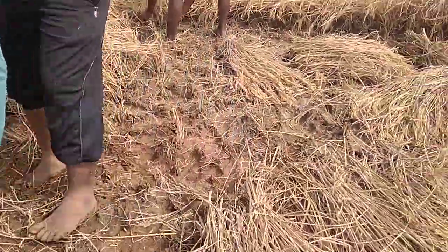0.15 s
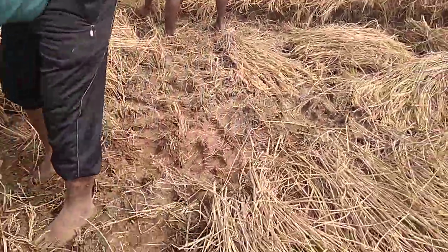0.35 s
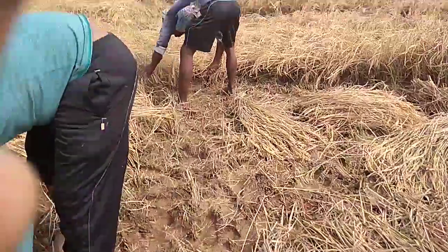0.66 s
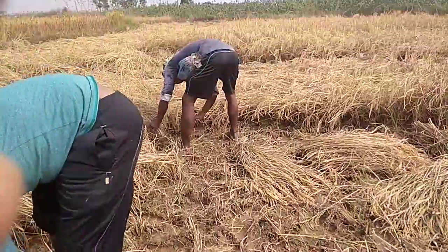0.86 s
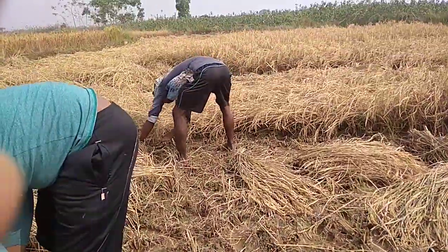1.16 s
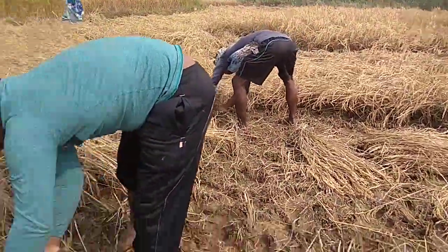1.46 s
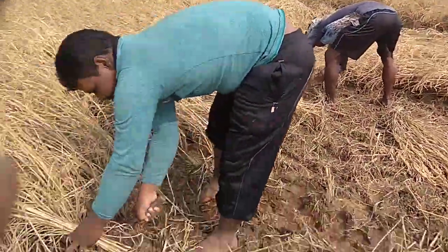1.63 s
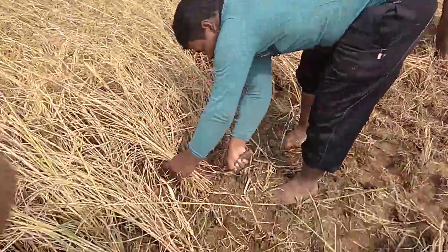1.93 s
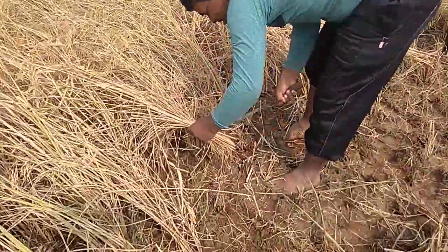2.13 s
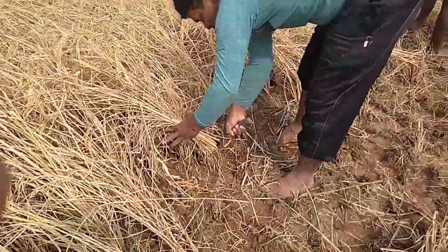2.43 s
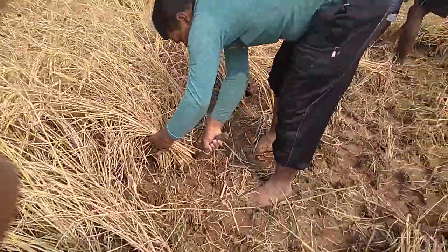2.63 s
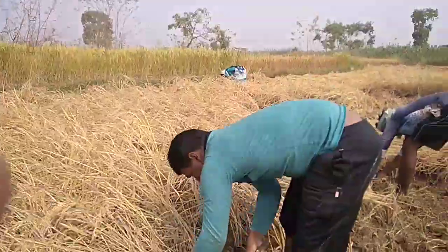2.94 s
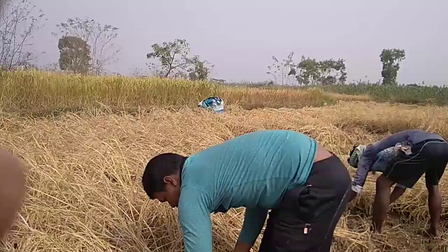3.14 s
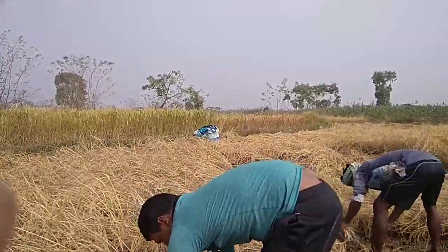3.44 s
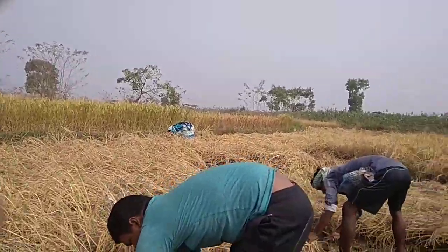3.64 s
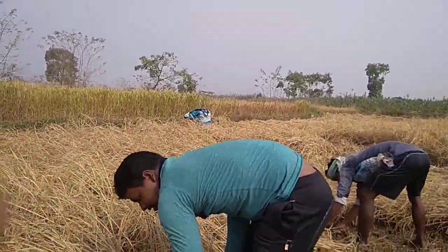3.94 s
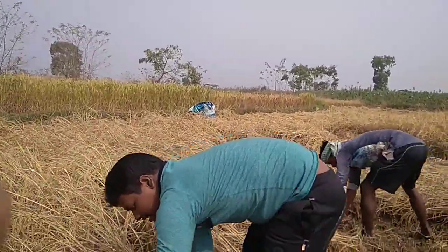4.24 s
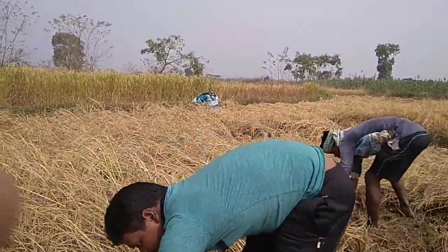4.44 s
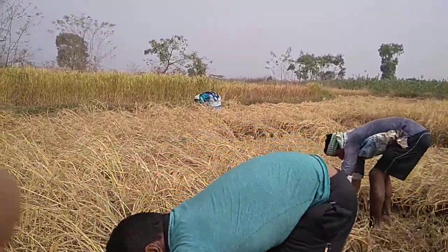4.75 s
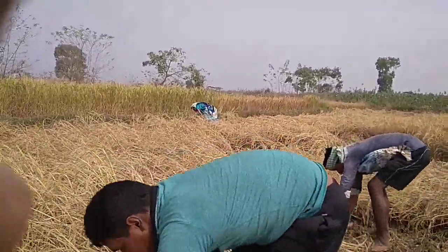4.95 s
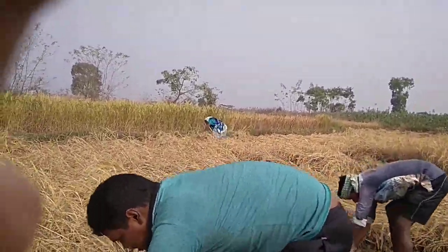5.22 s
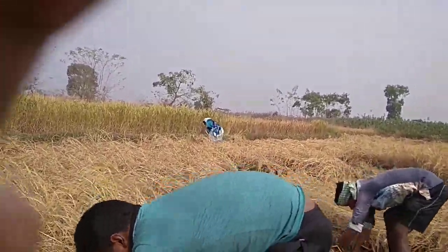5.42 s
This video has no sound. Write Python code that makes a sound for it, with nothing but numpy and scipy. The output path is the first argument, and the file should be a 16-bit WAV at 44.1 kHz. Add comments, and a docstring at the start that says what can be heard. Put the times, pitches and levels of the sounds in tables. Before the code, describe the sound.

In an open field, dry rice straw is handled close to a hand-held stereo camera, mainly on the left, with a faint steady noise beneath. At first there is only thin rustling and a few small cracks; a light sickle cut comes at 0.6 s with a tiny creak. A stronger, crisp cut at 1.1 s brings a burst of sharp snaps, and a faint distant whistle glides upward around 0.8-1.3 s. Husky swishes swell at 1.5 and 1.8 s, then another tearing cut at 2.1 s. Cuts follow near 3.0, 3.9, 4.9 and 5.6 s, each a quick double rasp with dull rubbing and hollow stem cracks; the one at 4.9 s is crisp, the 3.9 s one duller. Light knocks and bumps hit at 3.0 and 3.35 s. Low, fluttering wind buffets thump from 3.7 to 4.1 s and again near 4.6 s, while the bright straw hiss grows denser towards the end.

```python
"""Dry straw rustles close by on the left, and about once a second a sickle tears through a bunch.
Workers reap rice by hand in an open field: straw is made of tiny random fractures, the blade of noise
that swells with each bite, and snapping stems of short cracks with a hollow knock.
Wind at the two microphone ports of a hand-held camera is slow noise; buffets and handling bumps are brief
pressure swings. Dull rubs, light knocks, a faint steady noise and a far whistle of gliding tones join in."""
import sys
import numpy as np
from scipy import signal
from scipy.fft import rfft, irfft, next_fast_len
from scipy.io import wavfile
from scipy.ndimage import map_coordinates

SR = 44100
rng = np.random.default_rng(int(sys.argv[2]) if len(sys.argv) > 2 else 0)


def put_to_file(sound):
    """Save the sound as 16-bit audio at rate SR, in the file named by the first command-line argument."""
    columns = np.atleast_2d(sound).T  # one column per channel
    safe = np.clip(columns, -1, 1)
    whole_steps = np.round(safe * 32767)
    wavfile.write(sys.argv[1], SR, whole_steps.astype(np.int16))


N = 246078
TIME = np.arange(N) / SR

# sickle strokes, two bites each: (first bite [s], wait for the second [s], bite level before lifts [dB],
# second bite over first [dB], pull hiss before lifts [dB], pull rise and fall [s], left over right [dB])
STROKES = [(0.558, 0.025, -42.5, 2.5, -32.5, 0.067, 8.5), (1.092, 0.03, -36, 3, -30.5, 0.071, 7),
           (2.062, 0.026, -35.5, 0.5, -34.5, 0.04, 7.5), (2.967, 0.03, -38, 4, -33.5, 0.026, 13),
           (3.872, .024, -41, -8, -55, .02, 5), (4.943, 0.017, -33.5, -5, -31, 0.16, 7),
           (5.575, 0.022, -43, 6, -31.5, .02, 8)]
# colour of husks and thin cracks: (frequency [Hz], relative level [dB])
HUSK_COLOUR = [(300, -69), (1000, -29), (3200, -12), (5000, -11.5), (6400, -16), (7400, -2), (8700, 2),
               (11500, 2.5), (13500, 0), (16000, -9)]
# dull colour of the blade's drag and the rubs: (frequency [Hz], relative level [dB])
SCRAPE_COLOUR = [(80, -11), (200, -2), (320, 4), (520, -2), (700, -9), (1100, -19), (3000, -19)]
SNAP_SIDE_DB = 10.5  # snaps and creaks lie to the left


def amp(db):
    """Turn decibels into a gain."""
    return 10 ** (np.asarray(db) / 20)


def unit(x):
    """Scale a signal to an rms (average strength) of 1."""
    return x / np.sqrt(np.mean(x ** 2) + 1e-20)


def along(points, hz):
    """Read (frequency, value) points at any frequency, on a log axis."""
    f, value = np.transpose(points)
    return np.interp(np.log(hz + 1), np.log(f + 1), value)


def curves(rows):
    """Draw straight lines between the rows: one value per sample for each column after the time."""
    s, *columns = np.transpose(rows)
    return [np.interp(TIME, s, column) for column in columns]


def wobble(rate):
    """Make a smooth random curve with `rate` random points a second."""
    points = rng.standard_normal(int(N * rate / SR) + 4)
    return map_coordinates(points, [TIME * rate])


def swell(s, rise, fall):
    """A rounded peak of height 1 at time s with exponential flanks."""
    return np.exp(1 - np.hypot(1, (TIME - s) / np.where(TIME < s, rise, fall)))


def filtered(x, response):
    """Multiply the spectrum of x by a response that depends on frequency."""
    m = next_fast_len(N + 8192)
    spectrum = rfft(x, m) * response(np.fft.rfftfreq(m, 1 / SR))
    return irfft(spectrum, m)[..., :N]


def coloured(x, spectrum):
    """Shape x by a table of relative levels, then scale it to rms 1."""
    return unit(filtered(x, lambda hz: amp(along(spectrum, hz))))


def panned(side_db):
    """Left and right gains of constant total power."""
    left = amp(np.atleast_1d(side_db))
    return np.array([left, np.ones_like(left)]) / np.sqrt(1 + left ** 2)


def crackle(spectrum, rate, spread_db, smooth):
    """Stereo stream of tiny fractures, `rate` a second, on a bed of countless finer ones."""
    # likeness of left and right: (frequency [Hz], likeness [0 to 1])
    likeness = [(200, 0.99), (1000, 0.84), (2500, 0.24), (5000, 0.17), (10000, 0.02)]
    count = int(rate * N / SR)
    size = amp(spread_db * np.minimum(rng.exponential(size=count), 2))
    energy = np.bincount(rng.integers(0, N, count), size ** 2, N)
    # each fracture scatters among the neighbouring stalks for a few milliseconds
    energy = signal.fftconvolve(energy, amp(-60 * TIME[:1024] / .006))[:N]
    strength = np.sqrt(np.abs(energy / energy.mean()) + smooth)
    grains = strength * rng.standard_normal((2, N))

    def mid_and_side(hz):
        turn = np.arccos(np.clip(along(likeness, hz), -1, 1)) / 2
        return np.array([np.cos(turn), np.sin(turn)])

    mid, side = filtered(grains, mid_and_side)
    return coloured(np.array([mid + side, mid - side]), spectrum)


def clumped(x):
    """Stems of different width take turns to sound, so the colour shifts from moment to moment."""
    clump_db, clumps_per_s = 1.7, 45
    z = signal.stft(x, nperseg=512)[2]
    bins, frames = np.indices(z.shape[1:])
    points = rng.standard_normal(z.shape[1:])
    # one frame is 256 samples
    patches = map_coordinates(points, [bins / 2, frames * clumps_per_s * 256 / SR])
    shifted = z * amp(clump_db * unit(patches))
    return unit(signal.istft(shifted, nperseg=512)[1][:, :N])


def background():
    """A faint, steady background noise, almost all on the left."""
    # (frequency [Hz], relative level [dB])
    background_colour = [(60, 13.5), (250, 3.5), (500, -3), (1000, -13), (2000, -6.5), (3200, 7),
                         (5000, -19), (9000, -33), (16000, -12.5)]
    return amp(-54.0) * panned(21) * coloured(rng.standard_normal((2, N)), background_colour)


def whistle():
    """Thin, airy tones glide upwards and level off, scattered and broken up by the distance."""
    # far notes: (middle [s], length [s], start pitch [Hz], end pitch [Hz], peak level before wobble [dB])
    notes = [(.905, .3, 2130, 3060, -54.5), (1.22, .11, 1470, 1670, -57.5)]
    glide_share, glide_early = .16, .09  # as shares of the note's length
    far_t60_s, far_wet = .12, .55  # time to fade by 60 dB, amount of scattered sound
    out = np.zeros(N)
    for s, length, start_hz, end_hz, db in notes:
        u = np.clip((TIME - s) / length, -.5, .5)
        glide = (1 + np.tanh((u + glide_early) / glide_share)) / 2
        hz = start_hz + (end_hz - start_hz) * glide
        waver = 1 + .032 * wobble(900)  # fast pitch jitter makes the tone airy
        tone = np.sin(2 * np.pi * np.cumsum(hz * waver) / SR)
        out += amp(db + 3 * wobble(120)) * np.cos(np.pi * u) * tone
    tail = rng.standard_normal(8192) * amp(-60 * TIME[:8192] / far_t60_s)
    scattered = signal.fftconvolve(out, tail / np.linalg.norm(tail))[:N]
    return np.sqrt(1 - far_wet ** 2) * out + far_wet * scattered


def wind():
    """Eddies pass each port on their own; a strong gust breaks up into smaller, faster ones."""
    # steady breeze at the ports: (time [s], level before lifts [dB])
    breeze = [(0, -57), (.8, -60.5), (1.9, -61.5), (2.6, -48.5), (3.5, -70), (4.3, -42), (4.8, -45),
              (5.58, -47)]
    # gusts on top of it: (time [s], level before lifts [dB], rise and fall [s])
    gust_rows = [(2.985, -41.5, 0.021), (3.284, -43, 0.12), (3.666, -49, .03), (3.784, -33.5, 0.056),
                 (4.002, -28.5, 0.11), (4.586, -32, 0.067), (5.01, -36, 0.068), (5.57, -41, 0.025)]
    # colour of the deep rumble: (frequency [Hz], relative level [dB])
    rumble_colour = [(20, -1), (45, 2.5), (75, 6), (120, 4.5), (170, -8), (260, -23), (400, -59),
                     (700, -48), (1500, -34.5), (4000, -100)]
    # colour of the smaller eddies: (frequency [Hz], relative level [dB])
    flutter_colour = [(40, -23), (120, 4.5), (230, 2), (330, -9), (450, -22), (700, -66), (1500, -65),
                      (4000, -100)]
    breeze_db, = curves(breeze)
    gusts = sum(amp(db) * swell(s, half, half) for s, db, half in gust_rows)
    wind_db = 20 * np.log10(np.hypot(amp(breeze_db), gusts))
    lumps = amp(2.8 * np.array([wobble(35), wobble(35)]))
    rumble = unit(lumps * coloured(rng.standard_normal((2, N)), rumble_colour))
    rumble = amp(wind_db + 1.5) * rumble
    flutter = unit(lumps * coloured(rng.standard_normal((2, N)), flutter_colour))
    # flutter grows 2.48 dB for each dB of wind
    flutter = amp(2.48 * (wind_db - wind_db.max()) - 28) * flutter
    return rumble * amp([[-.5], [.5]]) + flutter * panned(13.0)


def bumps():
    """Wind buffets and handling bumps: each is a brief pressure swing at the ports with a short scuff."""
    # (time [s], size [dB], pitch [Hz], left over right [dB])
    swings = [(0.042, -34, 73, -14), (0.138, -30.5, 310, 31), (1.489, -33, 121, -23), (1.641, -28, 306, 24),
              (1.648, -37, 1300, 23), (2.087, -24.5, 440, 10), (2.988, -19, 570, 26), (3.205, -30, 151, 29),
              (3.3, -22, 116, 14), (3.3456, -14.5, 613, 38), (3.349, -20.5, 118, 26), (3.364, -31, 560, 26),
              (3.368, -29.5, 130, 22), (3.734, -13.5, 143, 20), (3.823, -11.5, 127, -22),
              (3.858, -18, 120, -20), (3.872, -27, 328, 22), (3.927, -17, 141, 15), (3.938, -21.5, 338, 22),
              (3.952, -10.5, 246, 27), (3.986, -17, 130, -18), (4.019, -13.5, 171, 24),
              (4.031, -20, 230, 18), (4.05, -17, 218, 23), (4.551, -17, 132, 27), (4.613, -19, 167, -23),
              (4.635, -12.5, 260, -33), (4.666, -13.5, 165, -31), (5.555, -22, 165, 45)]
    out = np.zeros((2, N))
    for s, db, hz, side_db in swings:
        near = np.abs(TIME - s) < .06
        t = TIME[near] - s
        swing = np.sin(2 * np.pi * hz * t + rng.uniform(0, 2 * np.pi)) / np.cosh(3.17 * hz * t)
        low_pass = signal.butter(4, 2 * hz, fs=SR)
        scuff = unit(signal.lfilter(*low_pass, rng.standard_normal(len(t))))
        trail = np.clip(t * hz, 0, 1) * amp(-26 - 60 * np.abs(t) / 0.15)
        out[:, near] += panned(side_db) * amp(db) * (swing + trail * scuff)
    return out


def knocks():
    """A light knock, perhaps a finger on the camera: a damped tone, a tick and a short case rattle."""
    # (time [s], strength [dB], pitch [Hz])
    taps = [(2.9944, -17, 1300), (3.3529, -14, 840), (3.3722, -28, 1100)]
    # colour of the case: (frequency [Hz], relative level [dB])
    case_colour = [(200, -18), (800, -7), (1700, 1), (3200, -15), (5000, -10), (9000, -15), (16000, -33)]
    knock_t60_s, rattle_t60_s = 0.0053, 0.077  # times to fade by 60 dB
    rattle_db, side_db = -25, 32  # rattle against the strength of the knock, left over right
    out, t = np.zeros(N), TIME[:4096]
    for s, db, hz in taps:
        case = coloured(rng.standard_normal(N), case_colour)[:len(t)]
        blow = (np.sin(2 * np.pi * hz * t) + .35 * case) * amp(-60 * t / knock_t60_s)
        chatter = amp(5 * wobble(400)[:len(t)])
        rattle = case * chatter * amp(rattle_db - 60 * t / rattle_t60_s)
        out[round(s * SR):][:len(t)] += amp(db) * (blow + rattle)
    return panned(side_db) * out


def rubs():
    """Dull, low rubs on the left, several just before a sickle stroke: swells of low crackle."""
    # (time [s], level [dB], rise and fall [s])
    rub_rows = [(0.165, -49, 0.017), (0.395, -50, 0.014), (0.538, -49, 0.02), (1.061, -42.5, 0.015),
                (1.908, -50.5, .02), (2.014, -47, 0.02), (2.504, -55, 0.065), (2.777, -53.5, 0.033),
                (2.962, -40, 0.012), (3.842, -39, 0.0068), (3.95, -46, .025), (5.221, -45, 0.016)]
    level = sum(amp(db) * swell(s, half, half) for s, db, half in rub_rows)
    return panned(11) * level * crackle(SCRAPE_COLOUR, rate=260, spread_db=2.5, smooth=0.3)


def creaks():
    """The blade squeaks briefly in a narrow band of noise as it cuts through the bunch."""
    # (time [s], level [dB], rise and fall [s])
    squeaks = [(.604, -43, .009)]
    # (frequency [Hz], relative level [dB])
    squeak_colour = [(2400, -50), (3050, -2), (3350, 0), (3650, -7), (4100, -50)]
    level = sum(amp(db) * swell(s, half, half) for s, db, half in squeaks)
    return panned(SNAP_SIDE_DB) * level * coloured(rng.standard_normal(N), squeak_colour)


def snaps():
    """A breaking stem gives a thin crack with a short scatter; its hollow tube knocks at its own pitch."""
    # runs under the blade or single snaps in the hand: (time [s], crack peak [dB], hollow knock peak [dB])
    breaks = [(.279, -31, -45), (.319, -29, -44), (.463, -21, -43), (.5335, -16, -33), (.618, -20, -37),
              (.648, -21, -40), (.757, -13, -37), (.5545, -19, -30), (.5755, -18, -22), (.5812, -15, -16),
              (.587, -19, -24), (.5955, -18, -28), (.601, -20, -32), (1.0455, -13, -33), (1.0475, -10, -30),
              (1.071, -15, -29), (1.0858, -7, -18), (1.0905, -10, -21), (1.0922, -11, -16),
              (1.1115, -14, -27), (1.1145, -11, -17.5), (1.1188, -6.5, -20), (1.123, -6.5, -20),
              (1.129, -14, -30), (1.918, -17, -32), (2.0105, -17, -27), (2.0602, -13, -18.5),
              (2.0655, -17, -23), (2.0715, -14, -17.5), (2.0785, -16, -21.5), (2.0935, -11, -19.5),
              (2.0975, -11, -19.5), (2.106, -18, -29), (2.294, -13, -33), (2.946, -23, -24),
              (2.962, -21, -26), (2.969, -23, -26), (2.99, -19, -25), (2.998, -13, -29), (3.3523, -18, -23),
              (3.757, -13, -33), (3.8435, -27, -23), (3.8538, -24, -19), (3.857, -26, -28),
              (3.870, -25, -27), (3.8783, -23, -19.5), (4.595, -11, -29), (4.711, -20, -33),
              (4.93, -10, -20), (4.9345, -12, -14), (4.9435, -18, -21), (4.953, -16, -22),
              (4.9585, -7, -15), (4.962, -9, -17), (4.972, -17, -25)]
    # colour of a stem splitting along its length: (frequency [Hz], relative level [dB])
    split_colour = [(200, -22), (500, -11), (750, -9), (1050, -11), (1600, 0), (2400, -1), (3200, 4),
                    (4000, -2), (5000, -11), (8000, -15), (16000, -30)]
    tube_hz, tube_spread = 3200, .07  # middle pitch, random spread as a share of it
    tube_rise_s, tube_t60_s, split_t60_s = .0006, .011, .0095  # t60: time to fade by 60 dB
    tube_share = 1.1  # weight of the ring against the splitting noise
    out, t = np.zeros((2, N + 2048)), TIME[:2048]
    cracks = coloured(rng.standard_normal((2, N)), HUSK_COLOUR)
    splits = coloured(rng.standard_normal(N), split_colour)
    onset = 1 - np.exp(-(t / .0002) ** 2)
    scatter = onset * (amp(-60 * t / .005) + amp(-19) * amp(-60 * t / .04))
    knock_onset = 1 - np.exp(-(t / tube_rise_s) ** 2)

    def peaked(x):
        return x / np.abs(x).max(axis=-1, keepdims=True)

    for s, crack_db, knock_db in breaks:
        part = rng.integers(N - len(t)) + np.arange(len(t))  # a random piece of the noise
        pitch_hz = tube_hz * np.exp(tube_spread * rng.normal())
        tube = tube_share * np.sin(2 * np.pi * pitch_hz * t) * amp(-60 * t / tube_t60_s)
        split = splits[part] * amp(-60 * t / split_t60_s)
        knock = knock_onset * (tube + split)
        snap = amp(crack_db) * peaked(cracks[:, part] * scatter) + amp(knock_db) * peaked(knock)
        out[:, round(s * SR):][:, :len(t)] += panned(SNAP_SIDE_DB) * snap
    return out[:, :N]


def rustle():
    """Husks hiss and stems crackle lower down, with short swells, pulls and small random jerks."""
    # handled straw, busier towards the end:
    # (time [s], husk hiss before lifts [dB], stem crackle before lifts [dB], left over right [dB])
    gathering = [(0, -49.5, -61, 3.5), (.25, -51.5, -56.5, 6), (.45, -62, -57, 11), (.82, -47, -60, 12),
                 (1.0, -40, -48.5, 10), (1.3, -42.5, -53, 9.5), (1.7, -52, -52, 11.5),
                 (1.95, -39.5, -47.5, 5.5), (2.8, -38, -44, 6), (3.7, -39, -46.5, 9),
                 (3.82, -37.5, -43.5, 7.5), (3.96, -32, -43.5, 10.5), (4.7, -34.5, -40, 10),
                 (4.85, -51, -41, 9), (5.05, -34, -42.5, 9), (5.4, -34.5, -45, 10.5),
                 (5.58, -34.5, -42.5, 7.5)]
    # short swells of husk hiss and stem crackle:
    # (time [s], husk hiss before lifts [dB], stem crackle before lifts [dB], rise and fall [s])
    short_swells = [(0.325, -47, -58, 0.021), (0.587, -55, -49, 0.02), (1.052, -38, -42, 0.0055),
                    (1.513, -33.5, -49.5, 0.11), (1.606, -45, -48, 0.03), (1.803, -34, -46, 0.037),
                    (1.922, -38, -42.5, 0.019), (2.21, -37.5, -51, 0.046), (2.6, -37.5, -46.5, 0.13),
                    (3.28, -38, -48, 0.077), (3.367, -43, -49, 0.0078), (4.448, -32, -61, 0.05)]
    # colour of the stems: (frequency [Hz], relative level [dB])
    stalk_colour = [(100, -17), (300, -10.5), (600, -14), (1000, -18.5), (1600, -11), (2400, -9), (3200, 1),
                    (4000, -4.5), (5000, -10), (7000, -1), (16000, -22.5)]
    bend_db, bend_rise_s, bend_fall_s = -1, 0.031, 0.028  # bend_db: against the bite level in the table
    husk_db, stem_db, side_db = curves(gathering)
    husk_swells = sum(amp(db) * swell(s, half, half) for s, db, _, half in short_swells)
    stem_swells = sum(amp(db) * swell(s, half, half) for s, _, db, half in short_swells)
    pulls, bends = np.zeros((2, N))
    # stems bend under each pull and spring back
    for s, gap, bite_db, _, pull_db, half, _ in STROKES:
        middle = s + gap / 2
        pulls += amp(pull_db) * swell(middle, half, half)
        bends += amp(bite_db + bend_db) * swell(middle, bend_rise_s, bend_fall_s)
    husk_level = np.hypot(amp(husk_db), husk_swells + pulls)
    stem_level = np.hypot(amp(stem_db), stem_swells + bends)
    jerks_db = .6 * wobble(25) + .5 * wobble(90)
    hiss = crackle(HUSK_COLOUR, rate=1200, spread_db=-0.5, smooth=1.0)
    stem_crackle = clumped(crackle(stalk_colour, rate=450, spread_db=4.5, smooth=.8))
    husks = husk_level * amp(jerks_db + 6) * hiss
    stems = stem_level * amp(jerks_db + 3.5) * stem_crackle
    return husks * panned(side_db) + stems * panned(side_db)


def bites():
    """List the two bites of each stroke: (time [s], level before lifts [dB], left over right [dB])."""
    return [(s + k * gap, db + k * second_db, side_db)
            for s, gap, db, second_db, _, _, side_db in STROKES for k in (0, 1)]


def sickle():
    """The toothed blade first drags dully over the bunch, then bites, tears through and comes free."""
    # colour of the tearing blade: (frequency [Hz], relative level [dB])
    blade_colour = [(60, -2), (250, 9), (500, 2), (750, 2), (1050, -13), (1600, -1), (2300, 0),
                    (3200, -1.5), (4300, 1), (6000, 1), (9000, 14.5), (16000, -65)]
    bite_rise_s, bite_fall_s = .008, .009
    drag_lead_s, drag_rise_s = 0.0052, 0.025  # the drag peaks just before each bite
    drag, tear = np.zeros((2, 2, N))
    for s, db, side_db in bites():
        gain = panned(side_db) * amp(db + 4.0)
        drag += gain * swell(s - drag_lead_s, drag_rise_s, bite_fall_s)
        tear += gain * swell(s, bite_rise_s, bite_fall_s)
    scrape = amp(-14.0) * drag * crackle(SCRAPE_COLOUR, rate=180, spread_db=8, smooth=0.23)
    return scrape + tear * crackle(blade_colour, rate=600, spread_db=5, smooth=0.22)


def scene():
    """Add all layers; the two ports hear the straw in different colours and a few samples apart."""
    # the right port faces away, so the colours differ:
    # (frequency [Hz], left over right before the port weights [dB])
    shade = [(200, -5.5), (1000, -1), (2000, -3.5), (3200, 5), (4500, 1.5), (6200, -6.5), (8000, 1),
             (11000, 2), (13500, 3), (15500, 19.5)]
    straw = rustle() + sickle() + snaps() + creaks()
    lag_s = 4 / SR  # the left port hears the straw this much later

    def ports(hz):
        shade_db = along(shade, hz)
        left = amp(0.25 * shade_db) * np.exp(-2j * np.pi * hz * lag_s)
        right = amp(-.8 * shade_db)
        return np.array([left, right])

    other_layers = background() + whistle() + wind() + bumps() + knocks() + rubs()
    return filtered(straw, ports) + other_layers


def record(dry):
    """The camera keeps nothing at or above its band limit of 15900 Hz."""
    return filtered(dry, lambda hz: hz < 15900)


dry = scene()
out = record(dry)
put_to_file(out)
```